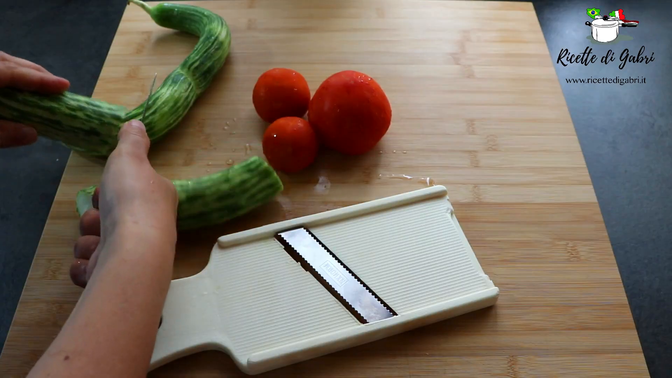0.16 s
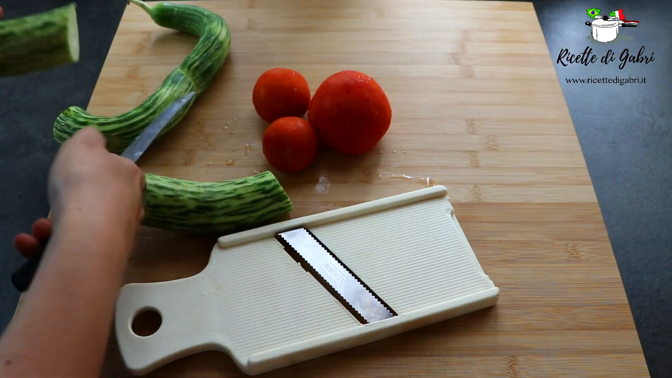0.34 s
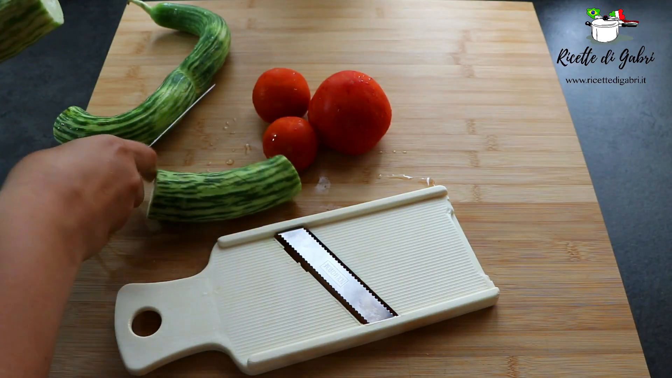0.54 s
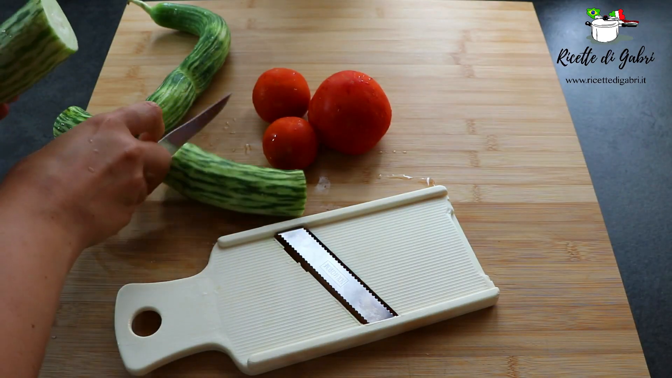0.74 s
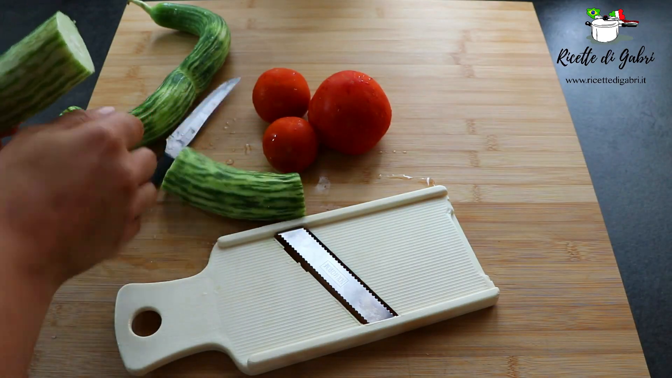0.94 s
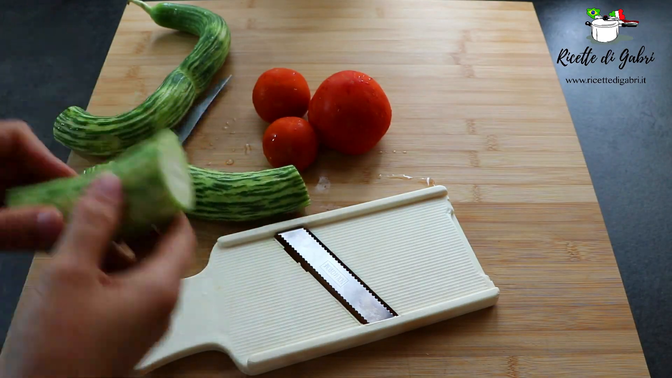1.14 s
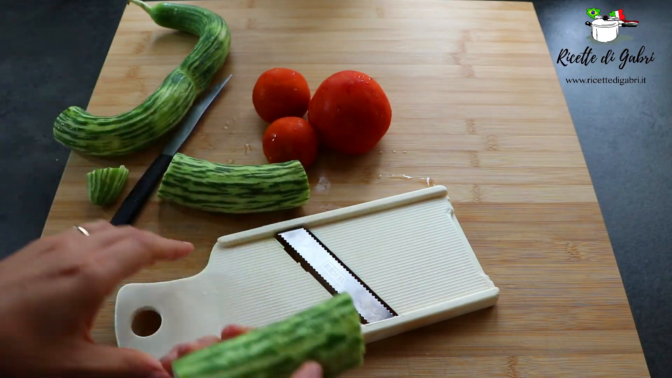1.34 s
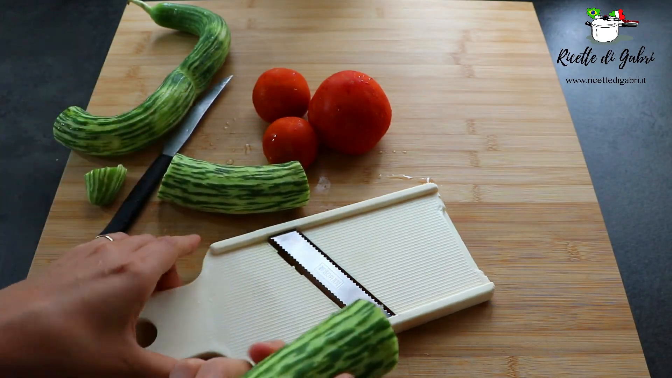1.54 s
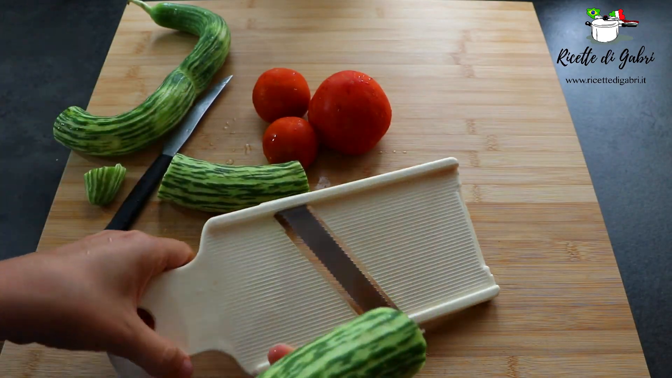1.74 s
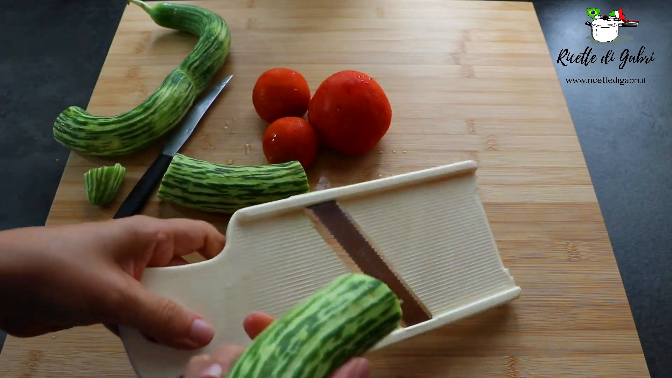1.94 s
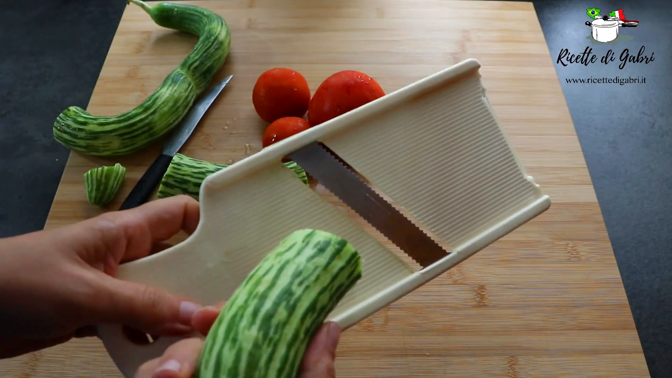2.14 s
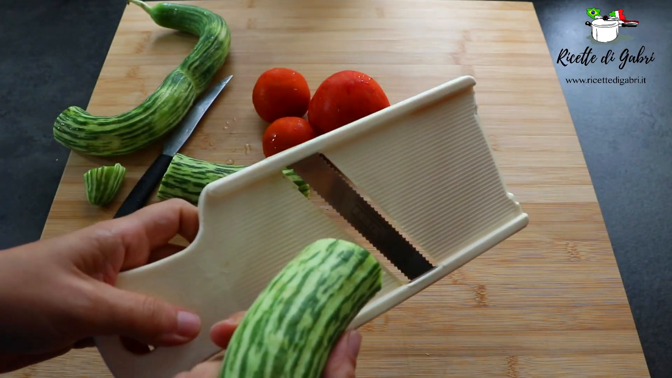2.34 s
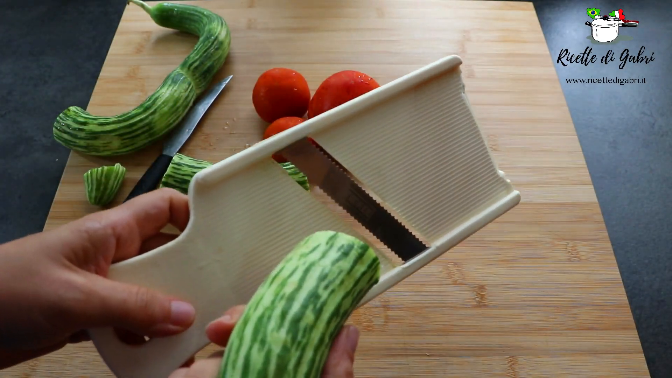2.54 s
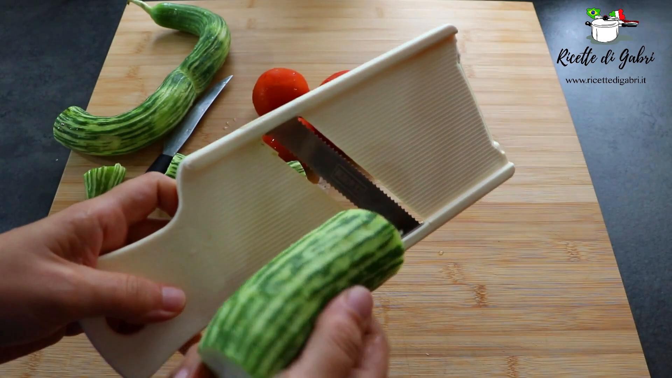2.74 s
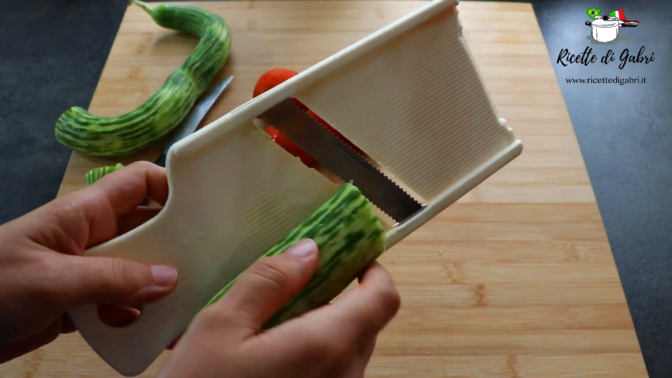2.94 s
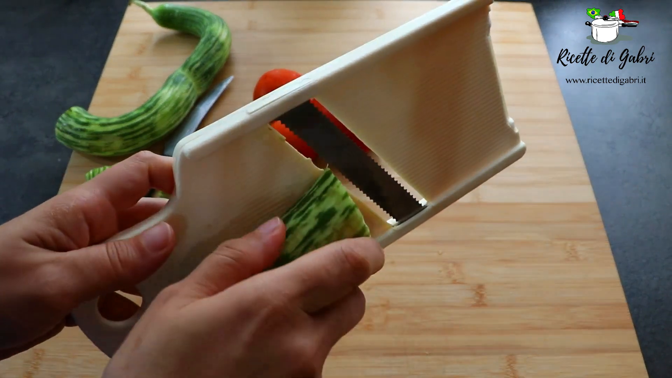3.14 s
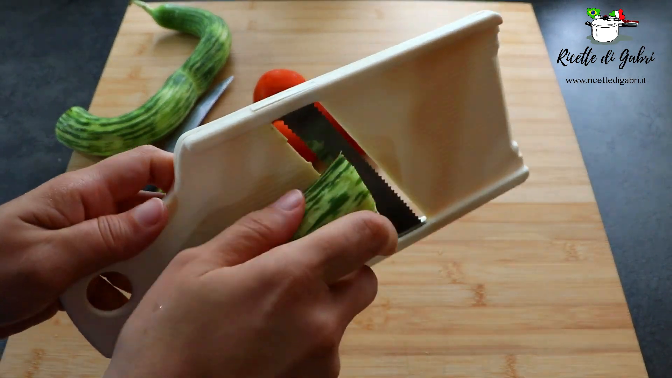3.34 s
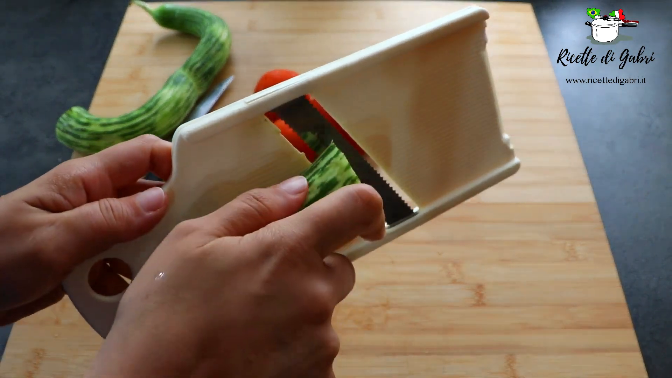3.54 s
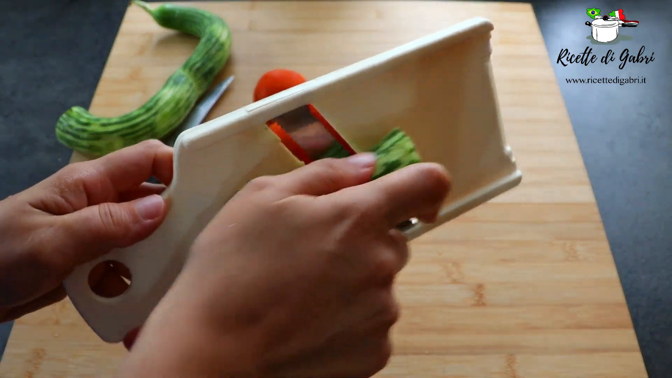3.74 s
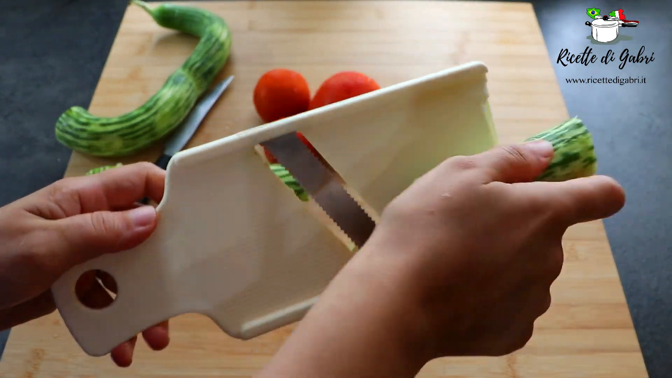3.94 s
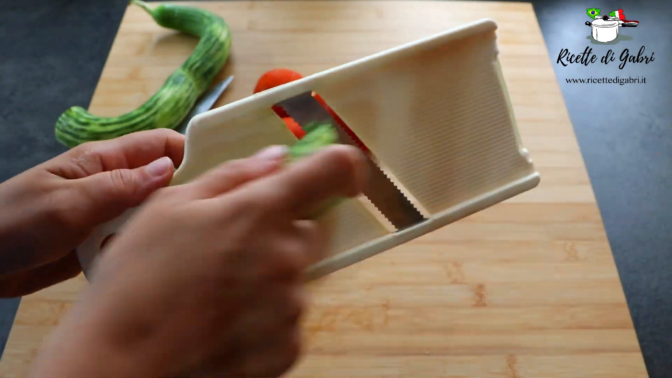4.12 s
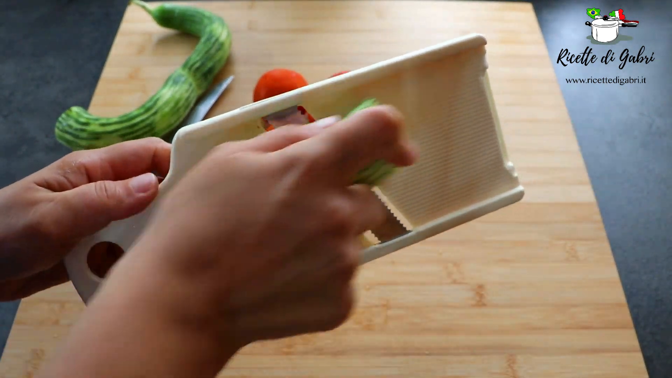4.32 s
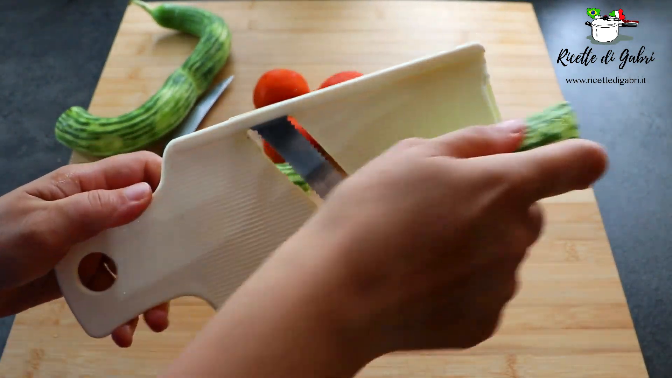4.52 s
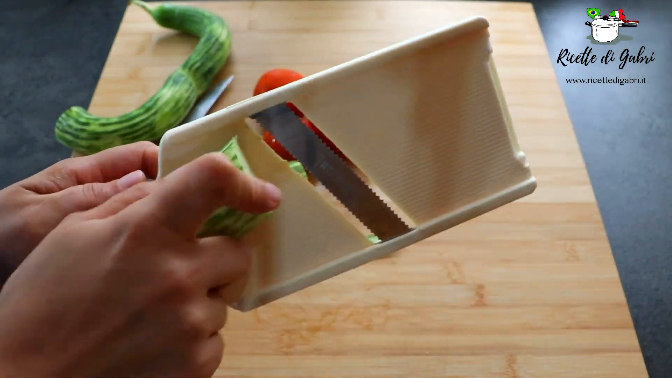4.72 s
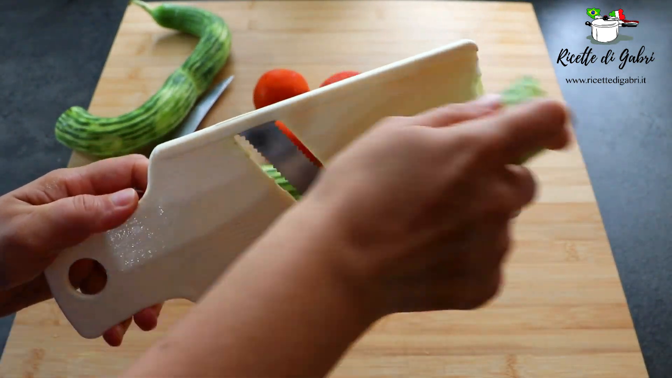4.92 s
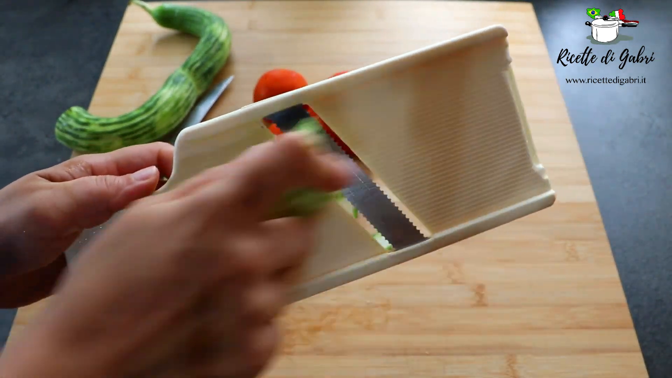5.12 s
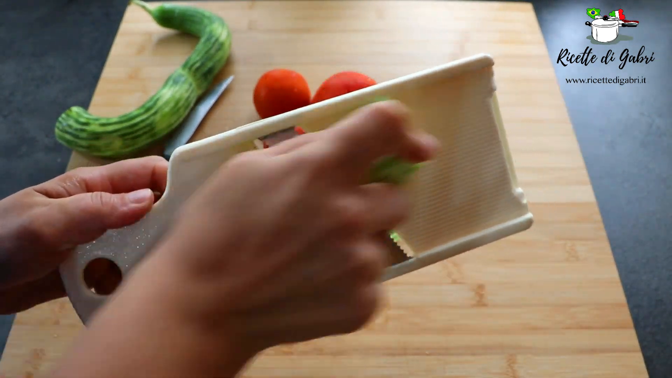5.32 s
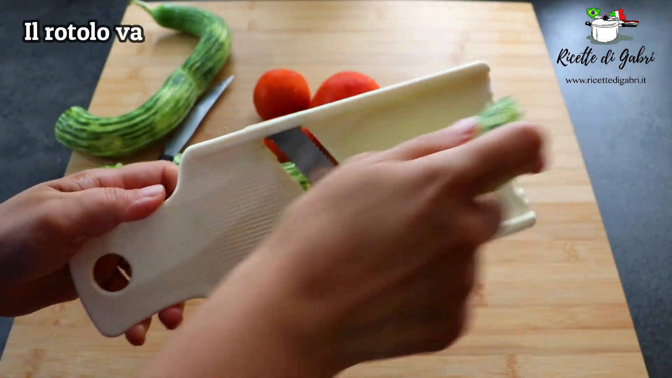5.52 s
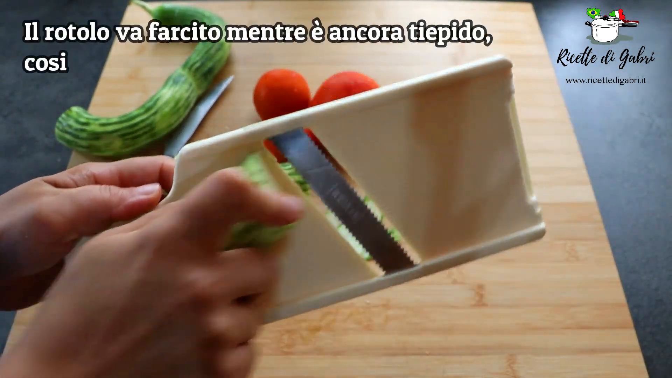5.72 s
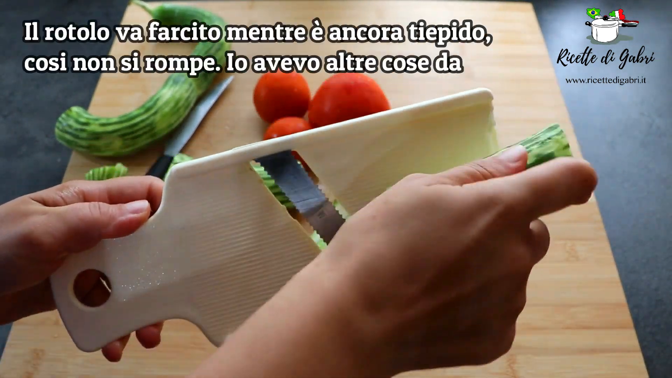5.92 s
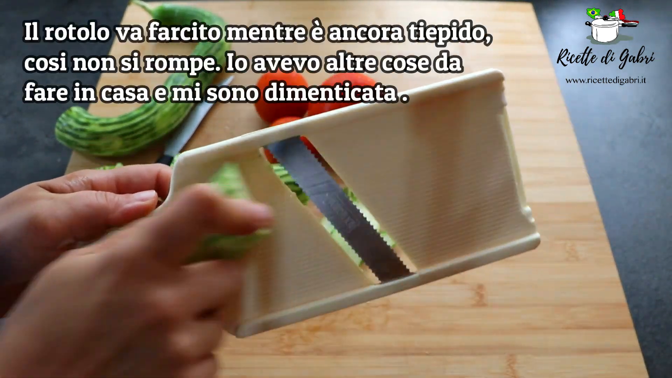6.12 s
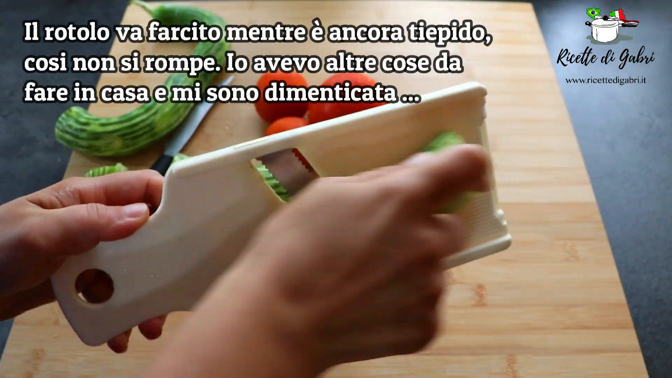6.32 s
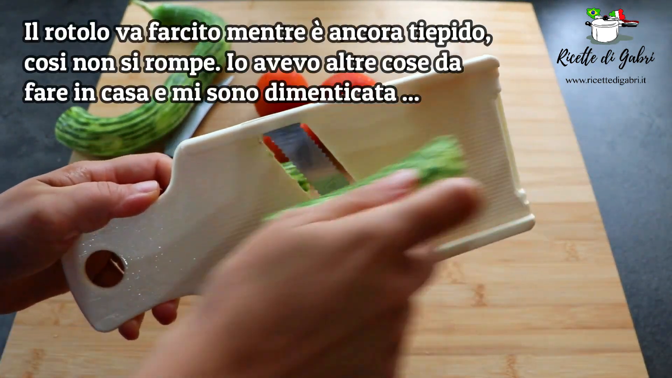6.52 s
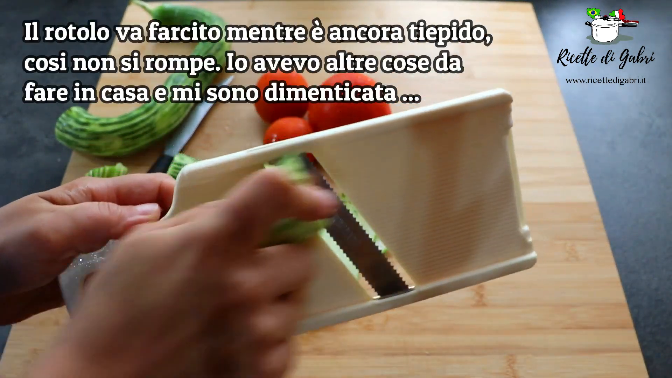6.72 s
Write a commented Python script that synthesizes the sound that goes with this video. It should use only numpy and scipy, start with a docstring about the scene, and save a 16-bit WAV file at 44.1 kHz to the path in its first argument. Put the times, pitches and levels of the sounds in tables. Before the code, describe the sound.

A cucumber is chopped on a wooden board a little way from the microphone, and the knife clatters down. Faint knocks and finger rubs follow as a plastic slicer is handled. Then come seven close, evenly paced slicing strokes, the cucumber slapping the plastic, rasping across the blade with a juicy fizz and flicking off the end. The small kitchen adds short, hard reflections and a faint steady murmur.

```python
"""A cucumber shaved on a plastic mandoline, close to the microphone in a small hard-walled kitchen.
In each of seven strokes it slaps onto the slicer's plate, rasps through the blade as its cells burst,
and flicks off at the far end. Before that, farther off, the cucumber is cut up on a wooden board,
the knife is dropped and rattles, and the mandoline is picked up. Mono, over quiet room tone."""
import sys
import numpy as np
from scipy import signal
from scipy.fft import rfft, irfft, next_fast_len
from scipy.io import wavfile
from scipy.ndimage import uniform_filter1d, map_coordinates

SR = 44100
rng = np.random.default_rng(int(sys.argv[2]) if len(sys.argv) > 2 else 0)


def wav_record(signal):
    """Record a signal, one row per channel, as 16-bit PCM in the file named by sys.argv[1]."""
    frames = np.transpose(np.atleast_2d(signal))
    bounded = np.clip(frames, -1, 1)
    # unit amplitude maps onto the largest positive 16-bit level
    quanta = np.round(bounded * 32767).astype(np.int16)
    wavfile.write(sys.argv[1], SR, quanta)


N = 302967

# passes through the blade, levels relative: start_s, length_s, attack_s, rasp_db, fizz_db, slide_db
STROKES = [(3.683, 0.24, 0.11, -35.5, -33.5, -75), (4.334, 0.15, .006, -30, -29.5, -48),
           (4.856, 0.12, 0.0079, -28, -27.5, -49), (5.328, .14, 0.022, -28, -27, -43),
           (5.834, .11, 0.0073, -25.5, -27.5, -35), (6.312, 0.13, .012, -28, -29, -32.5),
           (6.806, 0.089, 0.0087, -28.5, -30, -28.5)]
# modes of the mandoline's plastic plate: pitch_hz, level_db, t60_s
PLATE_MODES = [(700.2, 4, 0.073), (761, -3, 0.065), (1420, -24, 0.08), (1695, -5.5, 0.046),
               (1763, -4, 0.043), (2050, -11, 0.073), (2440, -11.5, 0.035), (2805, -21, 0.071),
               (3670, -29, .06)]


def shaving(cells_per_s=60000, cracks_per_s=620):
    """Thousands of cells burst on the blade: a fizz in the air, a rasp in the plate, a crunch of skin."""
    # spectra of the rasp, the fizz and the cracking skin: frequency_hz, level_db
    rasp_tone = [(71, -47), (120, -10), (220, -21), (422, 5.5), (599, 2), (676, 7), (875, -3), (1700, -0.5),
                 (2170, 2), (4500, -19), (5850, -46), (9900, -120)]
    fizz_tone = [(1760, -34), (3000, -9), (4080, -9), (4800, -4), (6210, -2), (6720, -7), (8380, -0.5),
                 (10200, -8.5), (13600, -4.5), (16000, -14.5), (16500, -36)]
    crunch_tone = [(400, -37), (1000, 9), (1700, 7.5), (3000, -2), (6000, -23), (12000, -40)]
    track = np.zeros(N)
    for start, length, attack, rasp_db, fizz_db, _ in STROKES:
        gain, progress = envelope(length, attack, release=.031)
        size = len(gain)
        press = amp(-.5 * (np.sin(np.pi * progress) - 2 / np.pi))  # a slight dip in mid-stroke
        bursts = grains(size, cells_per_s, spread_db=0)
        cells = hand_echoes(bursts)
        grip = rng.uniform(.85, 1.2)  # every stroke starts from a slightly different hold
        cavity = hollow(rng.standard_normal(size), start_hz=1050 * grip, end_hz=1910, width_hz=179)
        crunch = coloured(grains(size, cracks_per_s, spread_db=-.5), crunch_tone)
        rasp = amp(-5.5) * (coloured(cells, rasp_tone) + cavity)
        body = rasp + amp(-20) * through_plate(cells) + amp(-9.5) * crunch
        fizz = coloured(bursts + cells, fizz_tone)  # the treble comes mostly straight from the edge
        add(track, start, np.sqrt(gain) * press * amp(rasp_db) * body + gain * amp(fizz_db) * fizz)
    return track


def hand_echoes(x, shortest_s=.0007, longest_s=.0032, shrink=.16, share=.33, count=4):
    """Echoes between the moving hand and the plate arrive ever sooner: their comb glides upward."""
    n = np.arange(len(x))
    closing = 1 - shrink * n / len(x)
    delays = SR * np.linspace(shortest_s, longest_s, count) * rng.uniform(.9, 1.1, count)
    return unit(x + share * sum(map_coordinates(x, [n - delay * closing]) for delay in delays))


def hollow(x, start_hz, end_hz, width_hz, count=9):
    """A resonance that glides upward as the uncut length shrinks."""
    place = np.linspace(0, count - 1, len(x))
    glide = np.zeros(len(x))
    for k, centre_hz in enumerate(np.linspace(start_hz, end_hz, count)):
        crossfade = np.sqrt(np.clip(1 - abs(place - k), 0, 1))
        glide += crossfade * unit(filtered(x, lambda hz: width_hz * resonance(hz, centre_hz, width_hz)))
    return unit(glide)


def through_plate(x):
    """x ringing in the plate's modes, at rms 1; the higher modes radiate best."""
    def response(hz):
        modes = sum(amp(db) * resonance(hz, pitch_hz, width_hz=np.log(1000) / np.pi / t60)
                    for pitch_hz, db, t60 in PLATE_MODES)
        return modes * np.minimum(hz, 1800) ** 3.3
    return unit(filtered(x, response))


def mandoline_knocks(flex_hz=198, push_lead_s=.0011, grip_detune=.013):
    """The cucumber lands with a dull push; at every knock the frame clacks and the plate rings."""
    # the cucumber slapping down, levels relative: start_s, clack_db, tilt_db_per_octave, ring_db, push_db
    landings = [(3.0424, -25.5, 0, -28.5, -21.5), (4.2016, -10, 2, -25.5, -29),
                (4.223, -14, 0.5, -30, -12.5), (4.7559, -9.5, -3, -28, -13.5), (4.7685, -12, 3.5, -28, -18),
                (5.198, -5, 3.5, -13.5, -18), (5.7251, -5.5, 3, -16, -5), (6.2045, -4, 3, -15, -7.5),
                (6.6878, -14, 2, -22, -16), (6.6934, -2.5, 0, -14, -31)]
    # the cucumber flicking off the far end: start_s, clack_db, tilt_db_per_octave, ring_db
    flicks = [(3.935, -27, -0.5, -23.5), (4.5, -18.5, 1, -20.5), (4.9855, -15.5, 2, -16),
              (5.479, -17.5, -4, -32), (5.9625, -21.5, -4.5, -21), (6.4681, -20, -8.5, -15)]
    # the frame knocking in the hand, plus a late chatter of one landing (4.2309) and one flick-off (6.0153):
    # start_s, clack_db, tilt_db_per_octave, ring_db
    taps = [(1.5349, -34, -13, -48), (1.6127, -34, 0, -52), (1.6432, -23, -3.5, -57),
            (1.734, -25.5, 0, -55), (2.314, -32, -2.5, -28), (2.36, -29, -2.5, -28.5),
            (2.758, -42, -5, -26.5), (2.9811, -22, 3.5, -23.5), (3.4163, -30, 4.5, -25.5),
            (3.4394, -30.5, 6.5, -30), (4.2309, -21.5, 2, -40), (5.2378, -24, -3, -29.5),
            (6.0153, -27.5, 1.5, -50)]
    # spectrum of the frame's clack: frequency_hz, level_db
    clack_tone = [(29, -51), (50, -3), (250, 0), (500, -1), (729, -3), (1050, 2), (2210, -6), (2440, -5),
                  (3300, -10), (4350, -10), (5270, -15), (8540, -17), (9870, -28.5), (11400, -26.5),
                  (16000, -32)]
    track, t = np.zeros(N), seconds(4096)
    swing = (t - .0007) / .00026
    push = -swing * np.exp(-swing ** 2 / 2)  # the plate gives way, then springs back
    flex = amp(-18.5 - 60 * t / .058) * np.sin(2 * np.pi * flex_hz * t)  # the whole frame bends
    for start, *_, push_db in landings:
        add(track, start - push_lead_s, amp(push_db + 4.5) * (push + flex))
    # each place of contact drives the plate differently; the cucumber's weight lowers the pitch
    for knocks, upper_db, attack, pitch_ratio in [(landings, -22, .00085, .97),
                                                  (flicks, 10, .0004, 1.005),
                                                  (taps, -3.5, .0034, 1.03)]:
        for start, _, tilt, ring_db, *_ in knocks:
            tuning = pitch_ratio + grip_detune * rng.uniform(-.91, 1)
            hardness_db = upper_db + 2.43 * tilt  # hard blows reach the upper modes better
            modes = [(tuning * hz, db + hardness_db * (hz > 1000), t60) for hz, db, t60 in PLATE_MODES]
            add(track, start, amp(ring_db) * ring(modes, attack, vary_db=4))
    blows = landings + flicks + taps
    clacks = amp(-8.5) * contacts(blows, clack_tone, t60=.052, crack=1.9, rise=.0004, knee_hz=1165)
    track += clacks + amp(-14) * np.std(clacks) * through_plate(clacks)
    return filtered(track, lambda hz: (1j * hz / (1j * hz + 110)) ** 2)  # a small plate gives little bass


def sliding(approach_s=.095, rub_fall_db=20.5):
    """The cucumber slides up to the blade and squeaks on its way back; fingers shift on the frame."""
    # fingers and wet flesh rubbing on the plastic, levels relative: peak_s, level_db, length_s
    rubs = [(1.65, -33, .12), (1.736, -38.5, .16), (1.954, -37, .2), (3.428, -37, .08)]
    # faint wet squeaks: start_s, length_s, level_db
    squeaks = [(4.0, 0.2, -61), (6.062, 0.145, -56.5)]
    track = np.zeros(N)
    for start, *_, slide_db in STROKES:
        gain, _ = envelope(approach_s, attack=.00455, release=.005)
        add(track, start - approach_s, friction(gain * amp(slide_db)))
    for peak_s, db, length in rubs:
        gain, progress = envelope(length, attack=.006, release=.006)
        swell = amp(db - rub_fall_db * abs(2 * progress - 1))
        add(track, peak_s - length / 2, friction(gain * swell))
    for start, length, db in squeaks:
        gain, _ = envelope(length, attack=.03, release=.018)
        add(track, start, amp(db) * gain * wavering_tone(len(gain), centre_hz=1960, width_hz=27))
    return track


def friction(gain):
    """Soft friction over the ribbed plate."""
    # spectrum of the rubbing: frequency_hz, level_db
    slide_tone = [(120, -40), (200, -13), (763, 1), (1100, 1.5), (1700, -6), (2860, -12), (4600, -10.5),
                  (8500, -18.5), (16000, -31)]
    rub = grains(len(gain), per_s=3500, spread_db=2)
    return gain * (amp(-6.5) * coloured(rub, slide_tone) + amp(-19) * through_plate(rub))


def blade_ring(x):
    """The mandoline's steel strip sings on faintly after each stroke."""
    # modes of the strip: pitch_hz, level_db, t60_s
    blade_modes = [(1904, -4, 0.32), (2600, -18, 0.61)]
    steel = ring(blade_modes, attack=.001, vary_db=1, size=32768)
    return signal.fftconvolve(x, steel / np.linalg.norm(steel))[:N]


def knife_chops(ring_db=-10.5):
    """The knife comes down on the board and its steel rings."""
    # chops, levels relative: start_s, level_db, tilt_db_per_octave
    chops = [(0.178, -38.5, -8), (0.215, -30, -16), (0.7214, 2.5, -1.5), (0.768, -7.5, -4)]
    # spectrum of the edge striking wood: frequency_hz, level_db
    chop_tone = [(180, -45), (300, -16.5), (600, -18.5), (880, -22.5), (1130, 1), (1650, -2.5), (1980, -8),
                 (2800, -11), (3350, -19), (4200, -15.5), (4700, -21.5), (5700, -21), (8000, -25),
                 (16000, -57)]
    # modes of the knife: pitch_hz, level_db, t60_s
    knife_modes = [(1150, -7, .024), (1360, 6, .06), (1470, -5, .07), (1660, -5, 0.081), (2903, 2, 0.058),
                   (4150, 0, .08)]
    track = contacts(chops, chop_tone, t60=.029, crack=10, rise=.0005, knee_hz=4000)
    for start, db, _ in chops:
        add(track, start, amp(db + ring_db) * ring(knife_modes, attack=.0003, vary_db=2.5))
    return track


def knife_drop(start_s=.9832, first_flight_s=.072, flight_ratio=.8, rattle_gap_s=.021, count=4):
    """The dropped knife hops ever lower and sooner; handle and tip rattle between the bounces."""
    # spectrum of the knife bouncing on the board: frequency_hz, level_db
    bounce_tone = [(120, -42), (200, -12.5), (569, -11.5), (820, -11), (1050, -3), (1680, 1.5),
                   (2050, -2.5), (2330, -1), (3130, -11.5), (3900, -11.5), (8120, -34), (16000, -65)]
    hop = np.arange(count)
    hop_s = first_flight_s * (1 - flight_ratio ** hop) / (1 - flight_ratio)
    hop_db = 3.5 - 3.5 * hop ** 1.71
    rattle_s = rattle_gap_s * (np.arange(2 * count) + .55 + rng.uniform(-.12, .12, 2 * count))
    rattle_db = -7.5 - 42 * rattle_s
    times = start_s + np.concatenate([hop_s, rattle_s])
    levels = np.concatenate([hop_db, rattle_db])
    tilts = 3.5 + .44 * levels  # weaker blows are duller
    return contacts(zip(times, levels, tilts), bounce_tone, t60=.019, crack=4.5, rise=.0006, knee_hz=3000)


def parting_flesh():
    """Crisp flesh hisses and cracks as the knife parts it."""
    # cracks in the flesh, levels relative: start_s, level_db, tilt_db_per_octave
    snaps = [(0.009, -22.5, 6), (0.096, -23, 10), (0.359, -28, -4), (0.879, -11, 1), (0.96, -13, 0)]
    # spectra of the cracks and of the hiss: frequency_hz, level_db
    snap_tone = [(410, -36), (700, 2), (2370, 0.5), (2880, 1.5), (4380, -3.5), (4920, -2.5), (16000, -17)]
    hiss_tone = [(410, -45), (700, -12), (971, 2), (2490, -14), (7590, -6), (16000, -20)]
    track = amp(-10.5) * contacts(snaps, snap_tone, t60=.031, crack=3, rise=.00028, knee_hz=1200)
    gain, progress = envelope(.114, attack=.016, release=.01)
    cells = grains(len(gain), per_s=2500, spread_db=3)
    add(track, 0, gain * amp(-44 - 9 * progress) * coloured(cells, hiss_tone))
    return track


def board_thumps(rumble_t60_s=.38, shuffle_start_s=.4):
    """A soft weight gives the board a few heavy swings; the worktop rumbles on."""
    # the board struck by the knife, the cucumber and hands: start_s, level_db
    thumps = [(0.179, -18), (0.217, -15.5), (0.229, -18.5), (0.346, -29.5), (0.674, -34.5), (0.721, -32),
              (0.799, -25), (1.037, -29), (1.409, -30.5)]
    # modes of the board: pitch_hz, level_db, t60_s
    board_modes = [(90, -16.5, 0.14), (121.7, 8.5, 0.05), (161.3, -7, 0.11)]
    # spectrum of the worktop's rumble: frequency_hz, level_db
    worktop_tone = [(30, -21), (60, -5), (86, 7), (105, -7), (140, -9), (170, 3.5), (230, -18),
                    (500, -19.5), (1200, -66.5)]
    track, t = np.zeros(N), seconds(16384)
    for start, db in thumps:
        boom = ring(board_modes, attack=.0065, vary_db=3)
        rumble = coloured(rng.standard_normal(len(t)), worktop_tone) * decay(t, rumble_t60_s, rise=.02)
        add(track, start, amp(db) * (boom + amp(-9) * rumble))
    # hands shifting things about keep the worktop rumbling
    gain, _ = envelope(1.38, attack=.52, release=1.0)
    add(track, shuffle_start_s, amp(-41) * gain * coloured(rng.standard_normal(len(gain)), worktop_tone))
    return track


def kitchen_walls(x, build_up_s):
    """Reflections off hard walls build up quickly, and each frequency dies at its own speed."""
    # reverberation time: frequency_hz, t60_s
    decay_times = [(150, 0.4), (500, 0.54), (1400, 0.73), (3700, 0.7), (9000, 0.53), (15000, 0.36)]
    # spectrum of the reflections: frequency_hz, level_db
    wall_tone = [(100, 8.5), (500, 2.5), (1500, -4), (7000, 4.5), (15000, 1)]
    hz, t, noise = signal.stft(rng.standard_normal(SR), SR, nperseg=256)
    fading = amp(along(wall_tone, hz)[:, None] - 60 * t / along(decay_times, hz)[:, None])
    _, tail = signal.istft(noise * fading, SR, nperseg=256)
    tail *= 1 - np.exp(-seconds(len(tail)) / build_up_s)
    return signal.fftconvolve(x, tail / np.linalg.norm(tail))[:N]


def room_tone():
    """The steady murmur and hiss of the kitchen, with a faint wavering whine."""
    # spectrum of the murmur and hiss: frequency_hz, level_db
    murmur_tone = [(15, -37.5), (25, -11), (59, -9), (92, -22), (123, -5.5), (200, -9.5), (293, -6),
                   (560, -15.5), (775, -15), (1020, -20.5), (1260, -22.5), (2410, -26), (2910, -29.5),
                   (3430, -29), (16000, -35)]
    # tones of the whine: pitch_hz, level_db
    whines = [(2859, -72), (3004, -74), (6503, -75)]
    murmur = amp(-49.5) * coloured(rng.standard_normal(N), murmur_tone)
    return murmur + sum(amp(db) * wavering_tone(N, hz, width_hz=30) for hz, db in whines)


def contacts(blows, tone, t60, crack, rise, knee_hz, size=8192):
    """Each blow is an impulse of height crack and a dying chatter, through the body's tilted spectrum."""
    track, t = np.zeros(N), seconds(size)
    for start, db, tilt, *_ in blows:
        chatter = rng.standard_normal(size) * decay(t, t60, rise)
        chatter[0] += crack
        blow = signal.fftconvolve(chatter, body_response(tone, tilt, knee_hz))[:size]
        loudest_rms = np.sqrt(uniform_filter1d(blow ** 2, size=160).max())
        add(track, start, amp(db) * blow / loudest_rms)
    return track


def body_response(tone, tilt, knee_hz, size=2048):
    """The shortest impulse response with a given spectrum, tilted in dB per octave above a knee."""
    hz = np.fft.rfftfreq(size, 1 / SR)
    db = along(tone, hz) + tilt * np.log2(np.maximum(hz / knee_hz, 1))
    cepstrum = irfft(np.log(amp(db) + 1e-5))
    cepstrum[1:size // 2] *= 2  # folding onto positive time gives minimum phase
    cepstrum[size // 2 + 1:] = 0
    return irfft(np.exp(rfft(cepstrum)))


def ring(modes, attack, vary_db, size=16384):
    """Damped modes, struck at new strengths each time; peak 1."""
    t = seconds(size)
    sound = sum(amp(db + vary_db * rng.normal()) * decay(t, t60, attack) * np.sin(2 * np.pi * hz * t)
                for hz, db, t60 in modes)
    return sound / np.abs(sound).max()


def grains(size, per_s, spread_db):
    """Random tiny impulses of unequal size, rms 1."""
    impulses = rng.poisson(per_s / SR, size) * rng.standard_normal(size)
    return unit(impulses * amp(spread_db * np.clip(rng.standard_normal(size), -2, 2)))


def wavering_tone(size, centre_hz, width_hz):
    """A narrow band of noise, rms 1."""
    noise = rng.standard_normal(size)
    return unit(filtered(noise, lambda hz: np.exp(-((hz - centre_hz) / width_hz) ** 2)))


def resonance(hz, centre_hz, width_hz):
    """Frequency response of one damped mode."""
    return 1j * hz / (centre_hz ** 2 - hz ** 2 + 1j * hz * width_hz)


def envelope(length, attack, release):
    """A gain with straight ramps (times in seconds), and the progress from 0 to 1."""
    t = seconds(int(length * SR))
    return np.clip(t / attack, 0, 1) * np.clip((length - t) / release, 0, 1), t / length


def decay(t, t60, rise):
    """A quick rise, then a fall of 60 dB every t60 seconds."""
    return amp(-60 * t / t60) * (1 - np.exp(-t / rise))


def coloured(x, tone):
    """x shaped by the given spectrum, at rms 1."""
    return unit(filtered(x, lambda hz: amp(along(tone, hz))))


def filtered(x, response):
    """x through a response given as a function of frequency."""
    size = next_fast_len(len(x) + SR // 4)
    return irfft(rfft(x, size) * response(np.fft.rfftfreq(size, 1 / SR)), size)[:len(x)]


def along(points, hz):
    """Interpolate (frequency_hz, value) points on a log axis."""
    frequencies, values = np.transpose(points)
    return np.interp(np.log(hz + 1), np.log(frequencies + 1), values)


def add(track, start_s, sound):
    """Mix a sound in from start_s."""
    span = track[round(start_s * SR):][:len(sound)]
    span += sound[:len(span)]


def amp(db):
    return 10 ** (np.asarray(db) / 20)


def unit(x):
    return x / np.sqrt(np.mean(x ** 2) + 1e-20)


def seconds(size):
    return np.arange(size) / SR


def scene():
    """The board lies farther from the microphone than the raised mandoline, so it carries more room."""
    far = amp(-5.5) * knife_chops() + amp(-7.5) * knife_drop() + parting_flesh()
    knocks = mandoline_knocks()
    strokes = shaving() + sliding()
    near = knocks + strokes
    near += amp(-30) * blade_ring(near)
    walls = amp(-6.5) * kitchen_walls(far, build_up_s=.0048)
    walls += kitchen_walls(amp(-11) * knocks + amp(-10.5) * strokes, build_up_s=.0042)
    mono = far + near + board_thumps() + walls + room_tone()
    return np.array([mono, mono])


def record(dry):
    """The hardest blows flatten at full scale; nothing is kept above 16 kHz."""
    return np.array([filtered(np.clip(channel, -1, 1), lambda hz: hz < 16000) for channel in dry])


dry = scene()
out = record(dry)
wav_record(out)
```